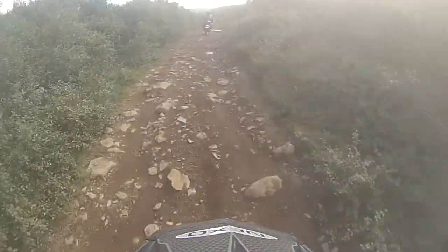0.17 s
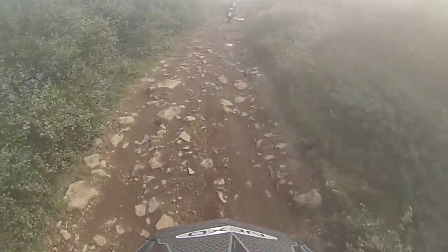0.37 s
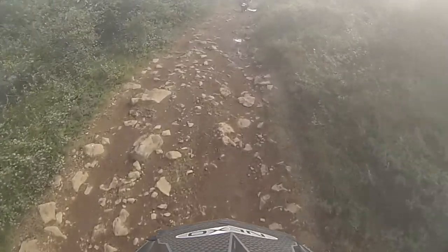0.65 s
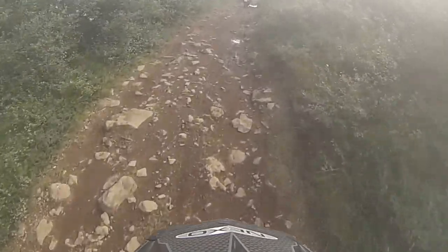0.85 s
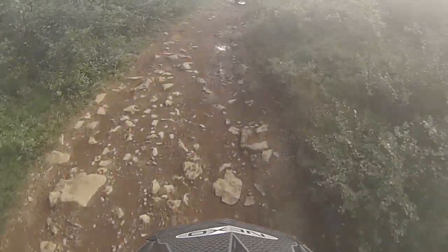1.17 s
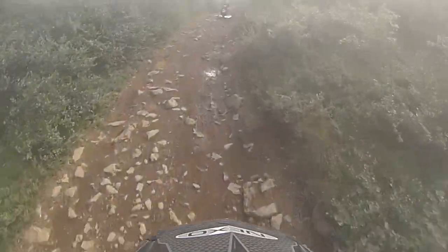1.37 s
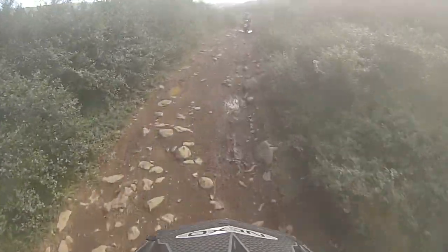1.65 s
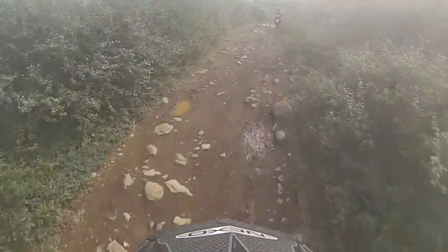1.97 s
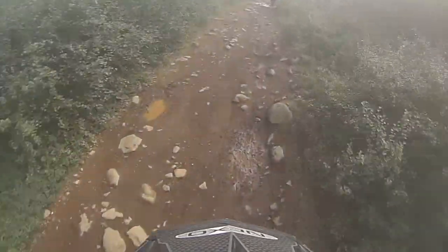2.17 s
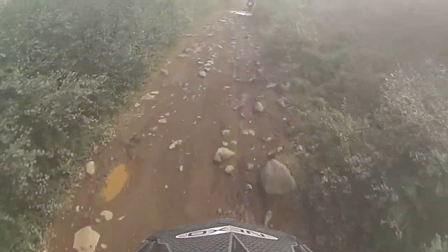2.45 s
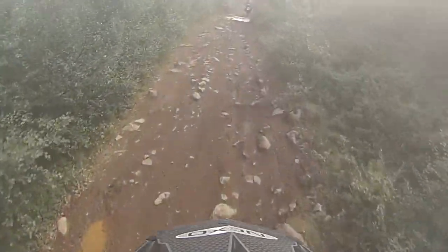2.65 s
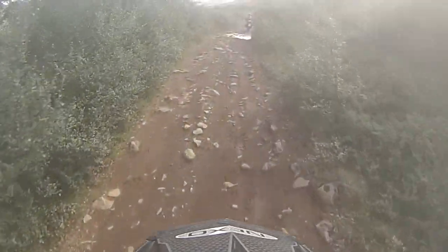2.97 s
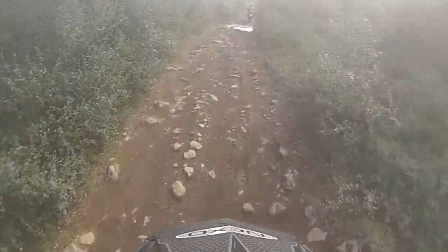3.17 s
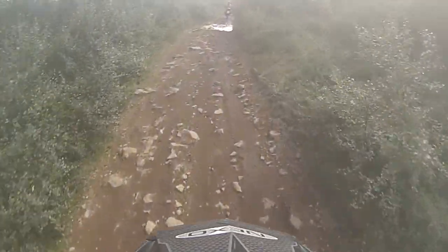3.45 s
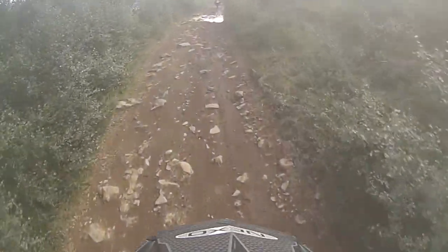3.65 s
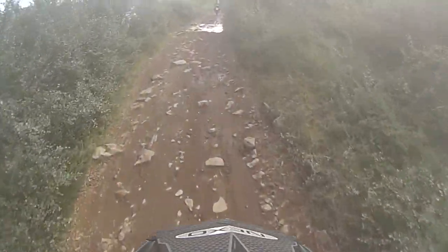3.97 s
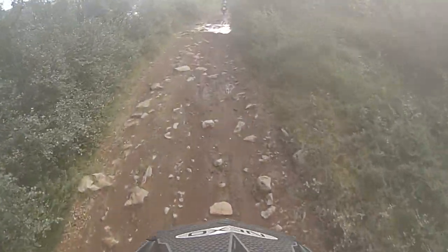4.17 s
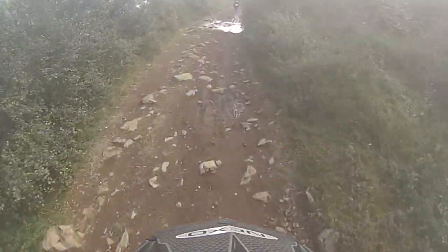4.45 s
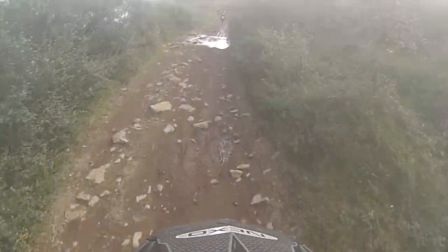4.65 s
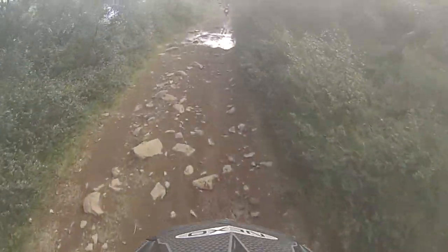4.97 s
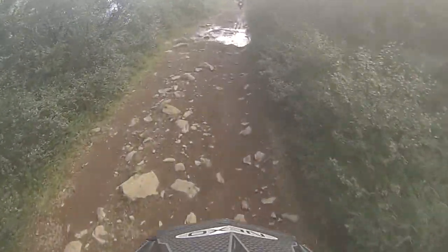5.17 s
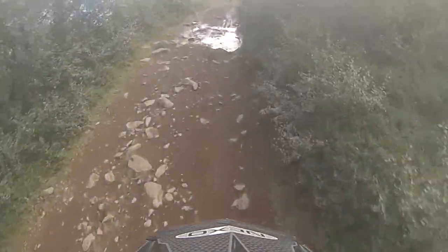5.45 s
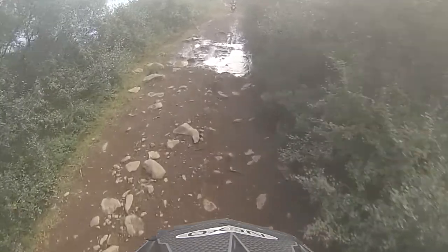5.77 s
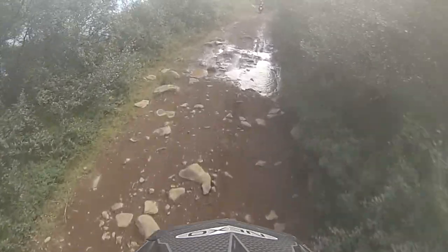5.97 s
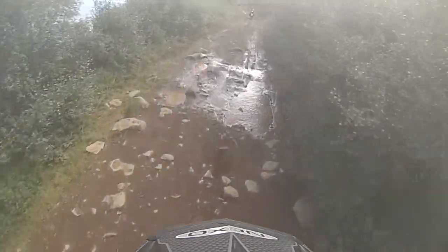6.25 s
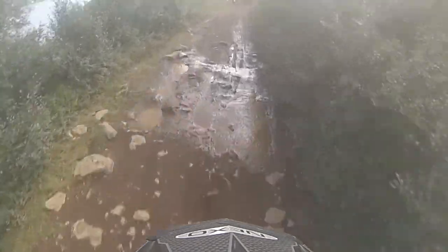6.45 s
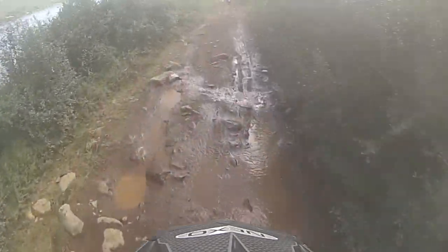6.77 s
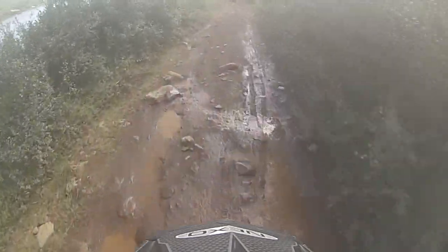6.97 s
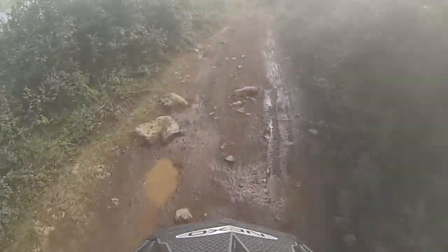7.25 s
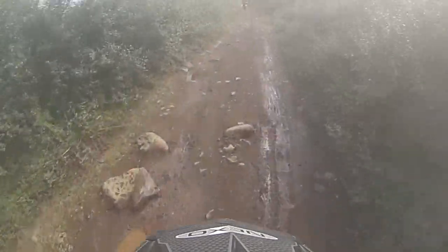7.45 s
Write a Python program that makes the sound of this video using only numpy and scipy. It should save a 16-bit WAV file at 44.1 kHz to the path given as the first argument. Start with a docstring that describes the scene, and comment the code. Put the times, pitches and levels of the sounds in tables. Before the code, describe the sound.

Onboard a dirt bike: throbbing engine with a wavering mechanical whine, deep wind buffeting, gritty tyre roll and sudden clacks of stones hitting the frame.

```python
"""Trail bike on a stony climb

A single-cylinder four-stroke climbs a dirt track, heard from a cased camera on the rider. Exhaust pulses thud
low; the timing chain's meshing teeth whine and rattle through the ringing engine case. Now and then a stone
makes the frame ring: a short burst of noise played through its resonances. Shaped noise gives the rumble of
wind and jolts, the tyres on the dirt and a faint hiss; clicks give the grit."""
import sys
import numpy as np
from scipy import signal
from scipy.fft import rfft, irfft
from scipy.io import wavfile
from scipy.ndimage import uniform_filter1d

SR = 44100
rng = np.random.default_rng(int(sys.argv[2]) if len(sys.argv) > 2 else 0)


def transcribe(signal):
    """Save signal, clipped to [-1, 1], as a 16-bit WAV file at the path in sys.argv[1]."""
    frames = np.atleast_2d(signal).T
    limited = np.clip(frames, -1, 1)
    pcm = np.round(limited * 32767).astype(np.int16)
    wavfile.write(sys.argv[1], SR, pcm)


N = 335160  # length of the sound in samples

CRUISE_HZ = 76  # crank speed from which the revs are counted
PULL_HZ_PER_S, PULL_SMOOTH_S = 155, 0.16  # speed-up that counts as open throttle, and time it is felt over
SMOOTH_ROLL_DB, STONY_RANGE_DB = -52.5, 1  # tyre roll on smooth dirt, and the rise that counts as fully stony
# levels at cruising speed with no pull on smooth dirt, their rise per octave of revs and under full pull
EXHAUST_DB, EXHAUST_DB_PER_OCTAVE, EXHAUST_PULL_DB = -44.5, 22.5, 2.5
OVERTONE_DB, OVERTONE_DB_PER_OCTAVE, OVERTONE_PULL_DB = -57, 17.5, 2
RATTLE_DB_PER_OCTAVE, SIZZLE_DB = 9, -19.5  # sizzle is relative to the rattle
STONY_EXHAUST_DB = 1  # the engine labours over stones
STONY_SLACK, STONY_OVERTONE_DB = 1.35, -4  # on stony ground the chain flaps more and its overtone fades
# how fast the crankshaft turns: time_s, turns_per_s
CRANK_SPEED = [(0.02, 89.1), (0.14, 73.42), (0.38, 78.78), (0.7, 67.23), (1.04, 69.8), (1.32, 79.03),
               (1.72, 81.35), (1.91, 76.55), (2.03, 70.57), (2.3, 73.07), (2.4, 78.4), (2.58, 70.03),
               (2.75, 68.84), (2.89, 87.05), (2.97, 75.8), (3.08, 76.97), (3.4, 69.2), (4.24, 68.52),
               (4.37, 74.9), (4.79, 75.5), (4.91, 82.84), (5.07, 73.28), (5.17, 74.44), (5.25, 84.43),
               (5.6, 75.53), (5.73, 76.94), (5.8, 84.08), (5.99, 83.13), (6.1, 78.77), (6.41, 75.65),
               (6.5, 85), (6.67, 77.97), (6.95, 79.1), (7.15, 84.95), (7.26, 76.84), (7.42, 82.66),
               (7.53, 70.1)]
# the ride along the track: time_s, wind_db, tyre_roll_db, rattle_db (the rattle at cruising speed)
TRACK = [(0, -32, -53.5, -51.5), (0.9, -30.5, -55, -51.5), (1.45, -29, -50.5, -49.5),
         (1.9, -32, -53, -51.5), (2.25, -29.5, -53, -49.3), (2.65, -31.5, -55.5, -50.5),
         (3.2, -31.5, -55.5, -52), (4.2, -35.5, -56, -51), (4.6, -25.5, -49, -50.5),
         (5.1, -31.5, -54.5, -51), (5.45, -27, -51, -50.5), (5.65, -32.5, -54.5, -51),
         (6.35, -29.5, -55.5, -52), (6.75, -27.5, -52.5, -51.5), (7.6, -28, -55, -51)]
# loudness of the chain whine: time_s, level_db
WHINE_LEVEL = [(0, -47.5), (0.2, -51), (0.45, -45.5), (0.7, -54.5), (1.05, -53.5), (1.35, -48),
               (1.55, -51.5), (1.78, -48.5), (2.0, -50), (2.4, -48), (2.7, -51), (2.85, -45), (3.25, -53),
               (4.05, -50), (4.3, -53.5), (4.9, -47.5), (5.72, -51), (5.98, -46), (6.85, -51), (7.4, -47),
               (7.6, -51.5)]


def engine(case):
    """Exhaust and chain overtone grow with revs and pull, rattle and sizzle with revs; the whine has its table."""
    crank_hz, = curves(CRANK_SPEED)
    _, roll_db, rattle_db = curves(TRACK)
    whine_db, = curves(WHINE_LEVEL)
    turns = np.cumsum(crank_hz) / SR
    revs = np.log2(crank_hz / CRUISE_HZ)  # octaves above cruising speed

    speed_up = np.gradient(crank_hz) * SR
    felt_speed_up = uniform_filter1d(speed_up, size=int(PULL_SMOOTH_S * SR))
    pull = np.tanh(felt_speed_up / PULL_HZ_PER_S)
    stony = np.clip((roll_db - SMOOTH_ROLL_DB) / STONY_RANGE_DB, 0, 1)
    lope = (crank_hz.mean() / crank_hz) ** 3  # at low revs the flywheel evens out the firings less
    slack = 0.5 * (1 + STONY_SLACK * stony)

    exhaust_db = EXHAUST_DB + EXHAUST_DB_PER_OCTAVE * revs
    exhaust_db = exhaust_db + EXHAUST_PULL_DB * pull + STONY_EXHAUST_DB * stony
    overtone_db = OVERTONE_DB + OVERTONE_DB_PER_OCTAVE * revs
    overtone_db = overtone_db + OVERTONE_PULL_DB * pull + STONY_OVERTONE_DB * stony
    clatter_db = rattle_db + RATTLE_DB_PER_OCTAVE * revs

    first = chain(turns, lope, slack, multiple=1, surge=1.15, rough=0.5, flutter_db=2.7)
    second = chain(turns, lope, slack, multiple=2, surge=1.15, rough=0.55, flutter_db=3.3)
    upper = sum(chain(turns, lope, slack, multiple=k, surge=1.1, rough=0.9, flutter_db=1.5)
                for k in range(3, 6))

    thud = undb(exhaust_db) * exhaust(turns, uneven_db=3.5, odd=0.53)
    whine = undb(whine_db) * steady(ring(first, case))
    overtone = undb(overtone_db) * steady(ring(second, case))
    sizzle = undb(clatter_db + SIZZLE_DB) * steady(ring(upper, case))
    rattle = undb(clatter_db) * unit(ring(clatter(turns, depth=0.096), case))
    return thud + whine + overtone + sizzle + rattle


# resonances of the silencer: pitch_hz, width_hz, level_db
SILENCER_RESONANCES = [(73.2, 36, 4), (138, 18, -28), (208.3, 60, -13.5), (353, 220, -29)]


def exhaust(turns, uneven_db, odd):
    """Piston strokes pulse into the silencer; a firing every second turn adds the odd half orders."""
    strokes = 0
    for k in range(1, 12):
        strength = odd if k % 2 else 1
        strokes = strokes + strength * np.cos(np.pi * k * turns)
    uneven_strokes = strokes * undb(uneven_db * wander(30))
    return steady(ring(uneven_strokes, resonator(SILENCER_RESONANCES)))


TEETH = 17  # chain teeth that mesh in one crank turn


def chain(turns, lope, slack, multiple, surge, rough, flutter_db):
    """One partial of the tooth meshing: the crank surges at each firing, the slack chain smears the tone."""
    lag = lope * (surge * np.sin(np.pi * turns) + slack * wander(28.4))  # radians of one tooth
    mesh = multiple * (2 * np.pi * TEETH * turns + lag)
    tension = (1 + 0.17 * np.cos(np.pi * turns + 1.1)) * undb(flutter_db * wander(25))
    scatter = wander(110) * np.cos(mesh) + wander(110) * np.sin(mesh)  # narrow noise around the tone
    return tension * (np.cos(mesh) + rough * scatter)


def clatter(turns, depth):
    """Valve gear and piston: a dense rattle that swells once per engine cycle, every two turns."""
    return noise() * (1 + depth * np.cos(np.pi * turns))


# stones striking the bike: start_s, knock_db, dull_thump_db, bright_crack_db, decay_s (time to fall 60 dB);
# the levels are relative: all are raised by the same amount below
STONE_HITS = [(1.731, -56, -60, -62, 0.046), (2.028, -43, -48, -60, 0.074), (2.126, -50, -50, -59, 0.059),
              (2.362, -51, -51, -61, 0.084), (2.384, -49, -74, -65, 0.04), (4.472, -46, -53, -63, 0.045),
              (4.896, -47, -47, -59, 0.038), (4.918, -39.5, -41.5, -57, 0.077),
              (4.991, -46, -51.5, -55, 0.075), (5.084, -43, -59, -70, 0.071),
              (5.434, -47.5, -55, -60, 0.077), (5.836, -54, -57, -61, 0.062),
              (6.520, -47.5, -71, -69, 0.073), (7.003, -57, -71, -63.5, 0.19), (7.367, -42, -58, -62, 0.09),
              (7.404, -50, -52, -62, 0.076)]
# ways the struck frame and skid plate ring: pitch_hz, width_hz, level_db
FRAME_RESONANCES = [(1310, 160, 0), (1560, 290, 5), (1800, 590, -7), (2730, 570, -6.5), (4300, 1500, -27.5)]
# tone balance of the dull thump: pitch_hz, level_db
THUMP_TONE = [(120, -7), (330, 5), (700, 5), (1100, -3.5), (2200, -2), (12000, -44)]
# tone balance of the bright crack: pitch_hz, level_db
CRACK_TONE = [(1200, -4.5), (2800, 5), (4200, 7.5), (5400, -3.5), (6400, -1.5), (8000, -13), (11000, -13),
              (15000, -29)]


def stones():
    """Each stone gives a short scraping blow: the frame rings, the tyre thumps and grit cracks on top."""
    knock = unit(ring(noise(), resonator(FRAME_RESONANCES)))
    thump = unit(colour(noise(), THUMP_TONE))
    crack = unit(colour(noise(), CRACK_TONE))
    blows = np.zeros((3, N))
    t = np.arange(SR // 4) / SR
    for start_s, *levels_db, decay_s in STONE_HITS:
        start = int(start_s * SR)
        contact = 1 - np.exp(-t / 0.003)  # the blow builds over about 3 ms
        decay = np.exp(-np.log(1000) * t / decay_s)
        fade = (contact * decay)[:N - start]
        blows[:, start:start + len(fade)] += np.outer(undb(levels_db), fade)
    return undb(8) * np.sum(blows * (knock, thump, crack), axis=0)


THUD_DB = -50.5  # body thud between bumps
# tone balance of the wind buffeting: pitch_hz, level_db
BUFFET_TONE = [(2, -20.5), (6, 2.5), (14, 1.5), (22, -7), (32, -13), (45, -15), (60, -32), (120, -42),
               (300, -59), (1500, -110)]
# tone balance of the rolling tyres: pitch_hz, level_db
ROLL_TONE = [(60, -9), (130, 8), (165, 1.5), (225, 5), (300, -1), (520, -5), (950, -6.5), (2000, -6.5),
             (4000, -29), (8000, -33.5), (15000, -69)]
# tone balance of the air hiss: pitch_hz, level_db
HISS_TONE = [(1500, -1.5), (3500, 0.5), (5300, 0.5), (7500, -0.5), (10500, -2), (13000, -7), (15000, -14)]


def ride():
    """Wind and jolts shake the camera; the tyres roll over grit; air hisses past."""
    wind_db, roll_db, _ = curves(TRACK)
    shake, thump = jolts()
    # wind and jolts are unrelated, so their strengths add as powers
    buffet = np.hypot(undb(wind_db), shake) * steady(colour(noise(), BUFFET_TONE))
    body = resonator([(97.4, 14, 0)])
    thud = np.hypot(undb(THUD_DB), thump) * steady(ring(noise(), body))

    rolling = colour(noise() + 0.45 * grit(per_s=700, spread_db=2.5), ROLL_TONE)
    tyres = undb(roll_db) * unit(rolling * undb(1.48 * wander(8.5)))
    crunch = ring(grit(per_s=810, spread_db=6.5), resonator([(3480, 360, 0)]))
    gravel = undb(roll_db - 20.5) * unit(crunch * undb(2 * wander(7.5)))
    hiss = undb(-72.5) * unit(colour(noise(), HISS_TONE) * undb(1.1 * wander(28)))
    return buffet + thud + tyres + gravel + hiss


# bumps that jolt the rider: middle_s, length_s, buffeting_db, body_thud_db
JOLTS = [(0.173, .22, -39, -49), (0.54, 0.13, -23, -62), (1.048, 0.08, -25.5, -37),
         (1.528, 0.45, -22.5, -57), (2.108, 0.31, -20, -39.5), (4.916, 0.15, -50, -39),
         (5.447, 0.19, -26.5, -50), (5.763, 0.18, -19, -36.5), (7.0, .16, -45, -36.5),
         (7.202, 0.16, -31, -38.5), (7.362, 0.13, -29, -36)]


def jolts():
    """Each bump is one smooth swell; gives the gains of the buffeting and of the body thud."""
    t = np.arange(N) / SR
    gains = np.zeros((2, N))
    for middle_s, length_s, *levels_db in JOLTS:
        swell = np.cos(np.pi * np.clip((t - middle_s) / length_s, -0.5, 0.5)) ** 2
        gains += np.outer(undb(levels_db), swell)
    return gains


def grit(per_s, spread_db):
    """Random clicks, mostly small, a few large."""
    size = undb(spread_db * np.minimum(rng.exponential(size=N), 4))
    return unit((rng.random(N) < per_s / SR) * size * noise())


def noise():
    """White noise: equal strength at every pitch."""
    return rng.standard_normal(N)


def wander(rate_hz):
    """A random drift of spread 1, with ever less movement above the given rate."""
    return unit(irfft(rfft(noise()) / (1 + (freqs() / rate_hz) ** 2), N))


def resonator(modes):
    """How a body with steep-sided (pitch_hz, width_hz, level_db) resonances answers, never before it is struck."""
    f = freqs()
    power = 0
    for hz, width_hz, db in modes:
        detune = (f * f - hz * hz) / (f * width_hz)
        power = power + (undb(db) / (1 + detune ** 2)) ** 2
    # folding the log spectrum's transform into its first half makes the ringing follow the blow
    cepstrum = irfft(np.log(power + 1e-9), N)
    cepstrum[0] /= 2
    cepstrum[N // 2:] = 0
    return np.exp(rfft(cepstrum))


def ring(x, body):
    """Play a sound through a body."""
    return irfft(rfft(x) * body, N)


def colour(x, points):
    """Filter by a tone balance of (pitch_hz, level_db) points."""
    hz, db = np.transpose(points)
    gain = undb(np.interp(np.log(freqs()), np.log(hz), db))
    return irfft(rfft(x) * gain, N)


def freqs():
    """Frequencies of the spectrum bins in Hz, nudged off zero."""
    return np.arange(N // 2 + 1) * SR / N + 1e-6


def curves(table):
    """The columns of a table, joined by straight lines in time."""
    s, *columns = np.transpose(table)
    return [np.interp(np.arange(N) / SR, s, column) for column in columns]


def undb(db):
    """Decibels to gain."""
    return 10 ** (np.asarray(db) / 20)


def unit(x):
    """Scale to an rms (average strength) of 1."""
    return x / np.sqrt(np.mean(x ** 2))


def steady(x):
    """Even out the rms to about 1 over a sliding fifth of a second."""
    return x / np.sqrt(uniform_filter1d(x ** 2, size=SR // 5) + 1e-18)


# resonances of the engine case: pitch_hz, width_hz, level_db
CASE_RESONANCES = [(657.2, 54, 3), (775.4, 14, 1.5), (1074.5, 20, -1), (1190.4, 54.4, 8), (1320, 188, 5.5),
                   (1494, 100, 4.5), (1648, 150, 0), (1834, 55, -2.5), (2290, 264, -5), (2494, 100, -3),
                   (2684, 150, -4.5), (2840, 23, -4), (3045, 610, -8.5), (4000, 1290, -18),
                   (4625, 540, -19), (6075, 900, -23.5)]


def scene():
    """The bike, the stones and the ride add up at one microphone."""
    return (engine(resonator(CASE_RESONANCES)) + stones() + ride())[None]


TOP_HZ = 14700  # highest pitch the camera lets through


def record(dry):
    """The camera cuts the top with a steep low-pass; the sound fades in and out over 6 ms."""
    nearest_end = np.minimum(np.arange(N), np.arange(N)[::-1])
    edges = np.minimum(nearest_end / (SR * 0.006), 1)
    low_pass = signal.ellip(10, 0.2, 80, TOP_HZ, fs=SR, output="sos")
    return signal.sosfilt(low_pass, dry * edges)


dry = scene()
out = record(dry)
transcribe(out)
```